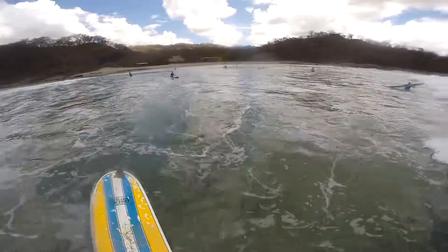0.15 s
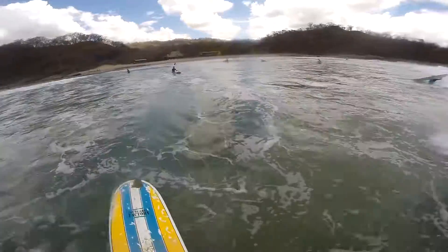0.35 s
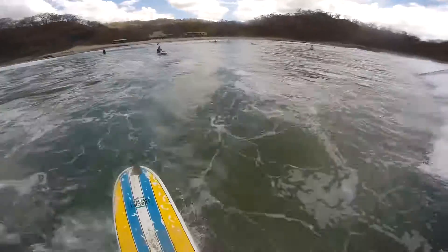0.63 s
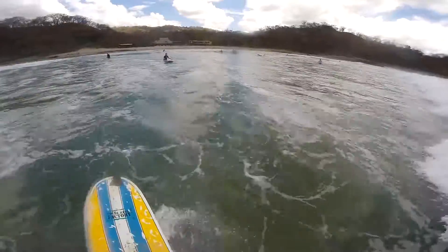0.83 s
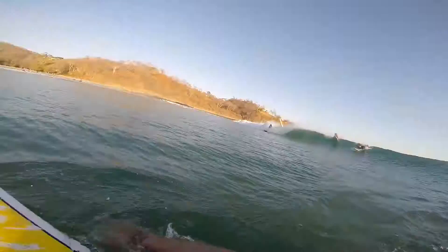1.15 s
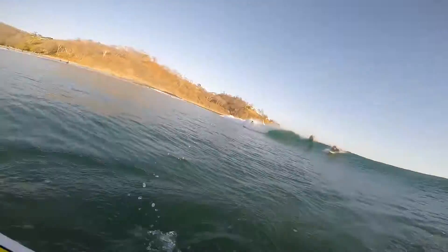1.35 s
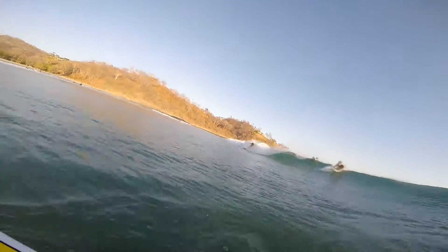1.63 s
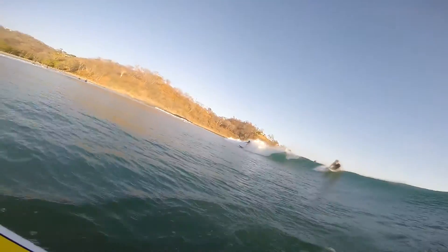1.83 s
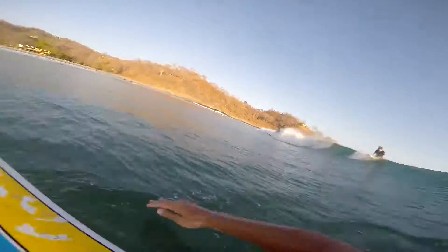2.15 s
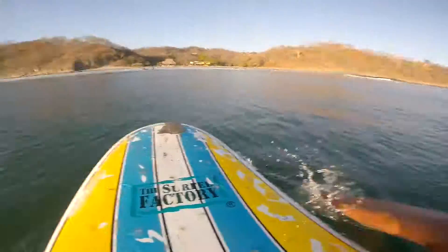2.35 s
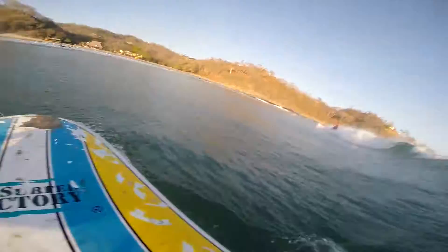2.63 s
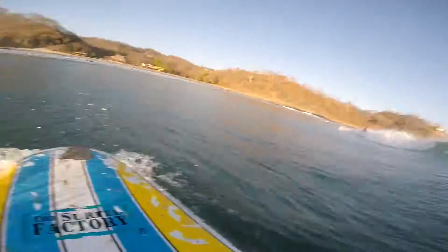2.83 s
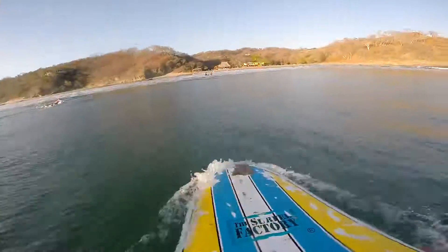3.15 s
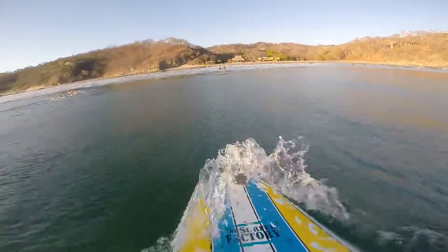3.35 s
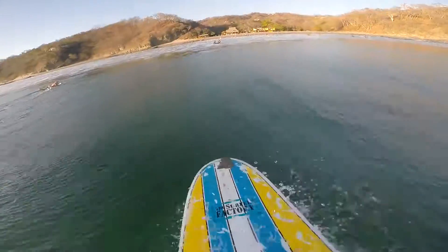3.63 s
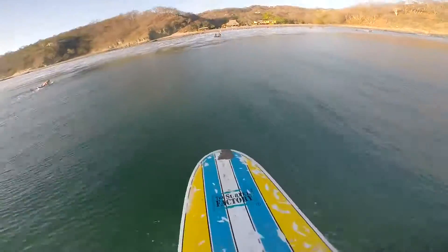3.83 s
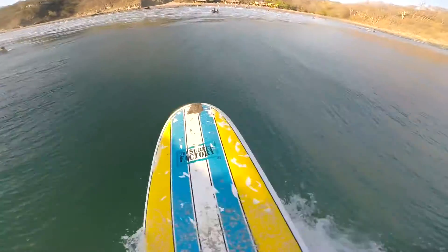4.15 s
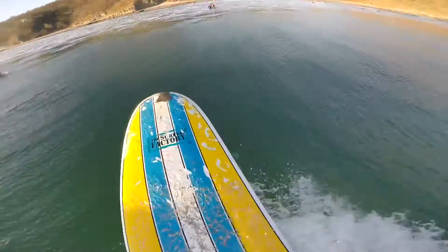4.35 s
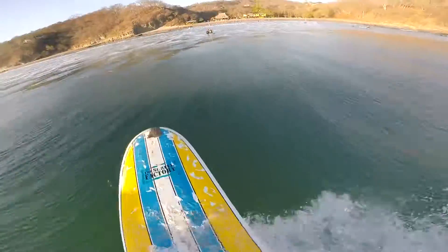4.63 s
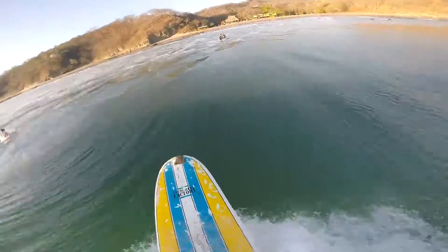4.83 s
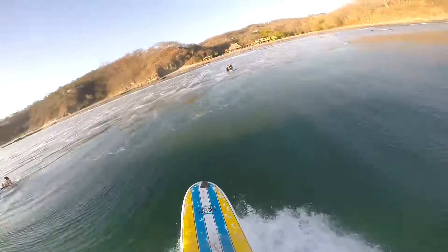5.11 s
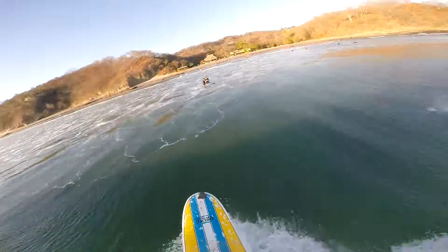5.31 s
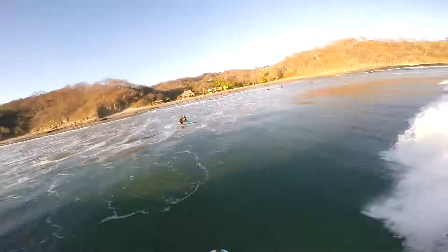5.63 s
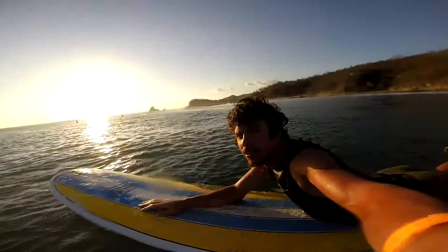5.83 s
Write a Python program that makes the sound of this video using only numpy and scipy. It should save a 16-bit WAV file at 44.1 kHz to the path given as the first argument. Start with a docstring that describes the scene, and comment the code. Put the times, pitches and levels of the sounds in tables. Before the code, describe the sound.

A close microphone inside a waterproof housing gives the water a resonant, slightly boxy colour, with little extreme treble. From 0 to 1.1 s a dense, steady rush and hiss of water glides past the board, with churning below and a very heavy low wind thump at 0.3 s. It cuts abruptly to paddling until 2.2 s: much quieter, bubbly trickling, with sloshes near 1.4, 1.6 and 2.2 s, small slaps and plinking bubbles. Another cut brings deep gusty wind rumble, crisp slaps around 2.3-2.9 s, and spattering splashes near 3.2-3.7 s, with a low thud at 3.4 s. From about 4.1 s the rush and spray jump up, fast and hissing, under strong wind buffeting until 5 s. Wind then eases while whitewater closes in, deeper and rougher from 5.3 s. A sharp slap and bump at 5.7 s cut to faint calm lapping and one tiny bubble.

```python
"""Water churning, rushing and spraying past a surfboard, heard by a microphone in a waterproof housing.
Four stretches join abruptly: gliding over foam, paddling, riding a wave until whitewater closes in, and
floating on calm water. Moving water is noise mixed with many ringing bubbles, shaped by the housing.
Slaps and droplets are short bursts of noise, and single bubbles ring, low and high. Spatter clumps in
the sloshes. Wind is deep noise that rises, falls and swells in gusts, with a few heavy pushes."""
import sys
import numpy as np
from scipy import signal
from scipy.fft import rfft, irfft
from scipy.io import wavfile
from scipy.ndimage import uniform_filter1d

SR = 44100
rng = np.random.default_rng(int(sys.argv[2]) if len(sys.argv) > 2 else 0)


def bounce(signal):
    """Save signal as a 16-bit WAV file at the path given by the first command-line argument."""
    frames = np.transpose(np.atleast_2d(signal))
    limited = np.clip(frames, -1, 1)
    pcm = np.round(limited * 32767).astype(np.int16)
    wavfile.write(sys.argv[1], SR, pcm)


N = 263277
TIME = np.arange(N) / SR  # seconds
FREQS = np.fft.rfftfreq(N, 1 / SR)  # Hz
FOAM_END, PADDLE_END, RIDE_END = 1.14, 2.24, 5.7195  # seconds
TOP_HZ = 15350  # upper edge of the sound

# slow rise and fall of the wind pressure on the microphone: t/s, level/dB
WIND_PRESSURE = [(0, -39), (.5, -33.5), (.95, -38), (1.7, -38.5), (2.1, -34), (2.55, -29), (3.0, -29.5),
                 (3.6, -31.5), (4.1, -27), (5.0, -29.5), (5.25, -38.5), (5.7, -37), (5.8, -44)]
# gusts on top of it: middle t/s, gain/dB
WIND_GUSTS = [(2.33, 4.5), (2.72, 4.5), (3.4, 3.5), (3.95, 5.5), (4.36, 4), (4.69, 7), (4.95, 4.5),
              (5.64, 9.5)]
# blows of air and hull bumps that push on the housing: t/s, peak level/dB, f/Hz
HOUSING_PUSHES = [(0.301, -6.5, 32.4), (0.343, -14, 22), (2.169, -30, 186), (3.375, -16, 38.3),
                  (3.43, -14, 28.64), (4.289, -19, 165), (4.2973, -17.5, 175), (4.683, -19, 24),
                  (4.729, -23.5, 210), (5.717, -23, 125)]
# resonances of the housing: f/Hz, half width/Hz, boost/dB
HOUSING_RESONANCES = [(1460, 117, 7.5), (2260, 330, 9), (2730, 500, 4), (4144, 400, 5), (5050, 316, 5.5),
                      (5740, 390, 7), (7060, 810, 4.5), (9680, 690, 3)]

# spectra, where only the differences between rows count: f/Hz, level/dB
# wind eddies
WIND_SPECTRUM = [(5, -4), (14, -18), (24, 4.5), (38, -4.5), (50, -5), (65, -22.5), (100, -33), (200, -83),
                 (500, -97)]
# calm water
CALM_SPECTRUM = [(40, 3.5), (80, -0.5), (170, -4), (300, -12), (500, -15.5), (900, -17.5), (1250, -20),
                 (1550, -16.5), (2000, -22.5), (3500, -27.5), (6000, -33), (10000, -39.5), (15500, -46)]
# churn under the hull, smooth and then deeper in whitewater
SMOOTH_CHURN_SPECTRUM = [(40, -13), (85, 1.5), (130, -1), (240, -4), (400, -5), (700, -5), (1000, -8.5),
                         (1500, -14), (3000, -72)]
DEEP_CHURN_SPECTRUM = [(40, 8.5), (75, 8.5), (130, -2), (200, -1.5), (300, -2.5), (450, -10), (700, -23),
                       (1000, -22), (1500, -24), (3000, -66)]
# rush over foam, along the rails while paddling, down the wave face, and in breaking whitewater
FOAM_RUSH_SPECTRUM = [(400, -19), (900, -12.5), (1200, -5.5), (1500, -10.5), (1780, -3), (1970, -2),
                      (2200, -5), (2600, -3), (3100, -5.5), (3500, -9.5), (4500, -36)]
PADDLE_RUSH_SPECTRUM = [(400, -32), (900, -12), (1250, 3.5), (1500, 3.5), (1750, 4.5), (2000, -1),
                        (2300, -1.5), (2700, 0.5), (3150, 1.5), (3500, -2), (4500, -23)]
FACE_RUSH_SPECTRUM = [(400, 4.5), (900, -2.5), (1200, -2), (1500, -1), (1800, -4), (2300, -1), (2650, 0.5),
                      (3100, -1.5), (3500, -7), (4500, -31)]
WHITEWATER_SPECTRUM = [(400, -7), (900, -6), (1250, -2), (1480, -6.5), (1600, 2.5), (1780, 6.5), (2000, -2),
                       (2300, -8.5), (2700, -5.5), (3100, 0), (3400, -18), (4500, -38)]
# spray while paddling, and at speed
PADDLE_SPRAY_SPECTRUM = [(2200, -35), (3500, -5), (4000, -6), (4600, 0), (5600, -6), (6500, -10),
                         (7300, -14), (8500, -17), (10000, -16.5), (13000, -31), (15500, -34)]
FAST_SPRAY_SPECTRUM = [(2200, -25), (3500, -2.5), (4200, -2.5), (5400, -2.5), (6400, -6), (7500, -8.5),
                       (8500, -12.5), (10000, -12), (12500, -18.5), (15500, -30)]

# water slapping the board: t/s, level/dB, centre f/Hz, spread/octaves, decay/s
BOARD_SLAPS = [(1.358, -28.5, 1720, 0.28, .003), (1.401, -35.5, 2380, 1.1, 0.0046),
               (1.585, -31.5, 2650, 0.36, 0.0062), (2.299, -35.5, 5370, 0.63, .006),
               (2.3166, -26.5, 3510, 0.8, 0.0025), (2.34, -36, 4600, 0.54, 0.0047),
               (2.4655, -26, 2250, 0.63, .0044), (2.472, -29, 1940, 0.54, 0.0064),
               (2.559, -51, 7400, .37, .021), (2.819, -37.5, 3540, 1.1, 0.0054),
               (2.8421, -25, 2330, 0.66, 0.0016), (2.8562, -21.5, 1280, 1.3, 0.0033),
               (2.993, -29.5, 1600, 1.6, .003), (3.2077, -33.5, 2400, 0.75, .015),
               (3.390, -37, 1200, 2, 0.0027), (3.3993, -32.5, 2200, 0.37, 0.013),
               (3.5967, -36, 3200, 0.95, 0.0063), (3.6353, -33, 2400, 1.4, 0.0044),
               (3.674, -34.5, 2570, 0.45, 0.0028), (3.697, -43.5, 5070, 1.1, .012),
               (4.2875, -32, 1200, 1.6, 0.006), (4.545, -36, 820, 1.1, 0.023),
               (5.7091, -18, 1150, 0.71, .002)]
# single bubbles, low and high: t/s, level/dB, starting f/Hz
SINGLE_BUBBLES = [(1.281, -33, 2630), (1.306, -30.5, 1400), (1.478, -33, 2830), (1.342, -31.5, 5830),
                  (1.392, -30.5, 1130), (1.538, -32, 2940), (2.43, -24.5, 1420), (2.5455, -31.5, 740),
                  (2.9693, -20.5, 1420), (3.523, -31, 4300), (5.918, -42, 1540)]
# water thrown up by a hand, the nose or a rail: middle t/s, length/s, rush gain/dB, spray gain/dB
WATER_SLOSHES = [(1.37, 0.21, 0.5, 2.5), (1.606, 0.16, 4.5, 3), (1.86, .13, 1, 2.5), (2.199, 0.12, 4.5, 2),
                 (2.535, 0.17, 1.5, 3.5), (2.868, 0.36, 1.9, 3), (3.23, 0.084, 3.2, 4),
                 (3.396, 0.2, 3, 5.5), (3.65, 0.33, 0.5, 4.5), (4.276, .1, 3, -0.5),
                 (4.966, 0.15, 1.5, 2.5), (5.346, 0.15, 2, -0.3), (5.714, 0.19, 2, 4)]
# board speed on the wave: t/s, speed/0-1
BOARD_SPEED = [(3.88, 0.05), (4.06, 0.31), (4.15, 0.73), (4.42, 0.57), (4.8, 1), (5.0, 0.77), (5.1, 0.78),
               (5.72, 1)]
# share of the rush that comes from breaking whitewater: t/s, share/0-1
WHITEWATER_SHARE = [(4.95, 0.2), (5.1, 0.26), (5.26, 0.64), (5.33, 0.96), (5.71, 0.83)]
# base flow past the board over foam, while paddling, and on the wave:
# churn level/dB, rush level/dB, spray level/dB
FOAM_FLOW = (-41.5, -36, -45)
PADDLE_FLOW = (-47, -47.5, -53.5)
WAVE_FLOW = (-51, -47, -55.5)
# what full speed and full whitewater add on the wave: churn gain/dB, rush gain/dB, spray gain/dB
FULL_SPEED_GAIN = (4.5, 8.5, 13.5)
FULL_WHITEWATER_GAIN = (11.5, 8.5, -0.4)


def gain_of(db):
    """Turns decibels into a factor."""
    return 10 ** (np.asarray(db) / 20)


def evened(x):
    """Scales a sound to an average strength (rms) of one."""
    return x / np.sqrt(np.mean(x ** 2) + 1e-20)


def add(mix, s, sound):
    """Mixes a sound in at a time in seconds."""
    part = mix[max(round(s * SR), 0):][:len(sound)]
    part += sound[:len(part)]


def follow(rows):
    """Draws each column of a time table as a curve, sample by sample."""
    s, *columns = np.transpose(rows)
    return [np.interp(TIME, s, column) for column in columns]


def between(start, end):
    """One inside a stretch and zero outside, with edges of about a millisecond."""
    inside = (TIME >= start) & (TIME < end)
    return uniform_filter1d(inside * 1., size=48)


def arch(middle, length):
    """A swell that rises from zero to one and sinks back."""
    return np.cos(np.pi * np.clip((TIME - middle) / length, -.5, .5))


def blend(a, b, share):
    """Passes from one sound to another at constant power."""
    share = np.clip(share, 0, 1)
    return np.sqrt(1 - share) * a + np.sqrt(share) * b


def housing_db(hz):
    """The housing resonates, boosting sound near certain pitches."""
    return sum(db * np.exp(-((hz - centre) / width) ** 2) for centre, width, db in HOUSING_RESONANCES)


def colour(x, spectrum, housed=True):
    """Filters a sound with a spectrum and, if housed, the housing; then evens its strength."""
    hz, db = np.transpose(spectrum)
    shape_db = np.interp(np.log(FREQS + 1), np.log(hz), db)
    if housed:
        shape_db = shape_db + housing_db(FREQS)
    return evened(irfft(rfft(x) * gain_of(shape_db), N))


def flutter(rate_hz):
    """Random wavering of unit strength, weakened below 6 Hz and above the given rate."""
    shape = FREQS / (FREQS + 6) / (1 + (FREQS / rate_hz) ** 2)
    return evened(irfft(rfft(rng.standard_normal(N)) * shape, N))


def bubble(hz, decay, rise=0.045):
    """A ringing bubble whose pitch climbs as it nears the surface."""
    t = np.arange(0, 6 * decay, 1 / SR)
    age = t / decay
    envelope = (1 - np.exp(-8 * age)) * np.exp(-age)
    # halved here, so the pitch itself climbs by the full rise in each decay time
    return envelope * np.sin(2 * np.pi * hz * t * (1 + rise * age / 2))


def swarm(low_hz, high_hz, per_s, cycles, spread_db, count=28):
    """Many small bubbles at a set of pitches, born at random; most are faint, a few stand out."""
    out = np.zeros(N)
    for hz in np.geomspace(low_hz, high_hz, count):
        chance, luck = rng.random((2, N))
        born = chance < per_s / count / SR
        pops = np.zeros(N)
        pops[born] = gain_of(spread_db * np.minimum(-np.log(luck[born]), 4))
        ring = np.sqrt(hz) * bubble(hz, cycles / hz)
        out += signal.oaconvolve(pops, ring)[:N]
    return evened(out)


def seethe(bubbles, bubbles_db, flutter_db, flutter_hz):
    """Near bubbles over the smooth wash of countless far ones, surging with the turbulence."""
    wash = rng.standard_normal(N)
    surge = gain_of(flutter_db * flutter(flutter_hz))
    return (wash + gain_of(bubbles_db) * bubbles) * surge


def wind():
    """Eddies roll over the microphone one after another, swelling in gusts, with a few heavy pushes."""
    eddies = signal.hilbert(colour(rng.standard_normal(N), WIND_SPECTRUM, housed=False))
    # even out the eddies over about 80 ms, so the pressure curve sets their level
    strength = np.sqrt(uniform_filter1d(abs(eddies) ** 2, size=3500))
    gusts_db = sum(db * arch(s, length=.19) for s, db in WIND_GUSTS)
    wavering_db = 2 * flutter(13.5)
    pressure_db = follow(WIND_PRESSURE)[0] + gusts_db + wavering_db
    out = gain_of(pressure_db) * evened(eddies.real / strength)
    for s, db, hz in HOUSING_PUSHES:
        length = 0.4 / hz  # half length of a push: 0.4 cycles
        t = np.arange(-3 * length, 3 * length, 1 / SR)
        push = -np.exp(-(t / length) ** 2) * np.cos(2 * np.pi * hz * t)
        add(out, s + t[0], gain_of(db) * push)
    return out


def calm():
    """Faint lapping around the floating board: ripples of bubbles in a soft wash."""
    ripples = swarm(300, 5000, per_s=400, cycles=3, spread_db=3, count=12)
    lapping = seethe(ripples, bubbles_db=-12.0, flutter_db=0.5, flutter_hz=25)
    lapping = colour(lapping, CALM_SPECTRUM, housed=False)
    return gain_of(-47.5) * lapping * between(RIDE_END, np.inf)


def spatter():
    """Each slosh flings clumps of separate droplets against the board and the housing."""
    drops = swarm(3500, 14500, per_s=900, cycles=2, spread_db=2.5, count=14)
    clump_db = 10 * np.minimum(flutter(50), 2)
    clumps = colour(drops * gain_of(clump_db), FAST_SPRAY_SPECTRUM)
    # a negative spray gain turns the droplets upside down
    thrown = sum((gain_of(db) - 1) * arch(s, length) for s, length, _, db in WATER_SLOSHES)
    return gain_of(-51.5) * thrown * clumps * between(0, RIDE_END)


def splashes(droplets_db=-16, droplets_decay=0.013):
    """Each slap is a short burst of spatter, then droplets fall back; single bubbles ring, low and high."""
    out = np.zeros(N)
    t = np.arange(6144) / SR
    hz = np.fft.rfftfreq(len(t), 1 / SR)
    attack = 1 - np.exp(-t / .0004)
    for s, db, centre_hz, octaves, decay in BOARD_SLAPS:
        distance = np.log2((hz + 1) / centre_hz) / octaves
        shape = gain_of(housing_db(hz)) / (1 + distance ** 2) ** 1.73
        shape /= 1 + (hz / 9000) ** 2  # softer treble
        sheet, sizes = rng.standard_normal((2, len(t)))
        drops = sizes * (rng.random(len(t)) < 900 / SR)  # about 900 droplets per second
        for burst, level_db, fade in (sheet, db, decay), (drops, db + droplets_db, droplets_decay):
            envelope = attack * np.exp(-t / fade)
            burst = evened(irfft(rfft(burst) * shape) * envelope)
            burst *= np.sqrt(np.mean(envelope ** 2))
            add(out, s, gain_of(level_db) * burst)
    out *= between(0, RIDE_END)
    for s, db, pitch_hz in SINGLE_BUBBLES:
        decay = 0.0032 * (1000 / pitch_hz) ** .55  # seconds; higher bubbles die sooner
        add(out, s, gain_of(db) * bubble(pitch_hz, decay))
    return out


def water():
    """Flow churns under the hull, rushes along the rails and sprays off them."""
    glugs = swarm(130, 1100, per_s=450, cycles=1.3, spread_db=2.5)
    pops = swarm(900, 3600, per_s=1400, cycles=3.6, spread_db=2.8, count=36)
    fizz = swarm(3100, 13560, per_s=1800, cycles=2.86, spread_db=2.5, count=36)

    swirl = seethe(glugs, bubbles_db=-15.0, flutter_db=-0.5, flutter_hz=35)
    smooth_churn = colour(swirl, SMOOTH_CHURN_SPECTRUM)
    deep_churn = colour(swirl, DEEP_CHURN_SPECTRUM)
    # at low speed single bubbles stand out; at planing speed they merge
    slow_rush = seethe(pops, bubbles_db=-5.5, flutter_db=.9, flutter_hz=32)
    slow_spray = seethe(fizz, bubbles_db=-4, flutter_db=1.2, flutter_hz=30)
    fast_rush = seethe(pops, bubbles_db=-11, flutter_db=.6, flutter_hz=45)
    fast_spray = seethe(fizz, bubbles_db=-10.5, flutter_db=.5, flutter_hz=40)
    # in whitewater single bubbles drown in a lower, rougher roar
    roar = seethe(pops, bubbles_db=-22, flutter_db=1.1, flutter_hz=50)
    whitewater = colour(roar, WHITEWATER_SPECTRUM)

    speed = follow(BOARD_SPEED)[0]
    breaking = follow(WHITEWATER_SHARE)[0]
    face_rush = colour(blend(slow_rush, fast_rush, speed), FACE_RUSH_SPECTRUM)
    foam_sounds = (blend(smooth_churn, deep_churn, 0.24),
                   colour(fast_rush, FOAM_RUSH_SPECTRUM),
                   colour(fast_spray, FAST_SPRAY_SPECTRUM))
    paddle_sounds = (smooth_churn,
                     colour(slow_rush, PADDLE_RUSH_SPECTRUM),
                     colour(slow_spray, PADDLE_SPRAY_SPECTRUM))
    ride_sounds = (blend(smooth_churn, deep_churn, breaking),
                   blend(face_rush, whitewater, breaking),
                   colour(blend(slow_spray, fast_spray, speed), FAST_SPRAY_SPECTRUM))
    ride_flow = [db + by_speed * speed + by_breaking * breaking
                 for db, by_speed, by_breaking in zip(WAVE_FLOW, FULL_SPEED_GAIN, FULL_WHITEWATER_GAIN)]

    rush_swell = sum(db * arch(s, length) for s, length, db, _ in WATER_SLOSHES)
    spray_swell = sum(db * arch(s, length) for s, length, _, db in WATER_SLOSHES)
    swells = (0.49 * rush_swell, rush_swell, spray_swell)  # churn swells about half as much as rush
    stretches = [(0, FOAM_END, FOAM_FLOW, foam_sounds),
                 (FOAM_END, PADDLE_END, PADDLE_FLOW, paddle_sounds),
                 (PADDLE_END, RIDE_END, ride_flow, ride_sounds)]
    out = np.zeros(N)
    for start, end, levels_db, sounds in stretches:
        flow = sum(gain_of(db + swell) * sound for db, swell, sound in zip(levels_db, swells, sounds))
        out += between(start, end) * flow
    return out


def scene():
    """All sources add up at the one microphone."""
    return (water() + spatter() + splashes() + wind() + calm())[None]


def record(dry):
    """Removes the treble above the upper edge."""
    low_pass = signal.firwin(511, TOP_HZ, window=("kaiser", 9), fs=SR)
    return signal.oaconvolve(dry, low_pass[None], "same")


dry = scene()
out = record(dry)
bounce(out)
```